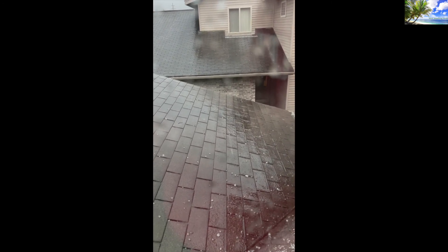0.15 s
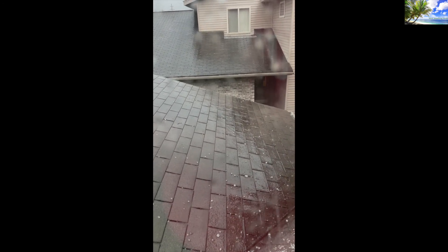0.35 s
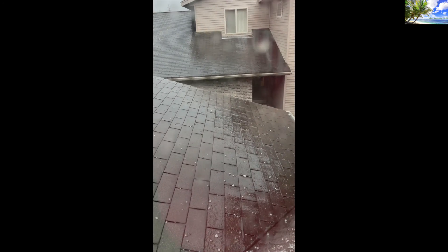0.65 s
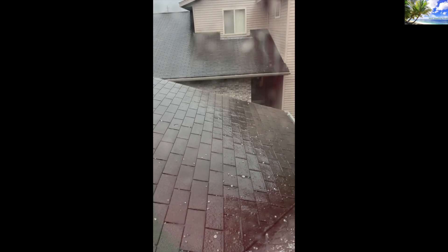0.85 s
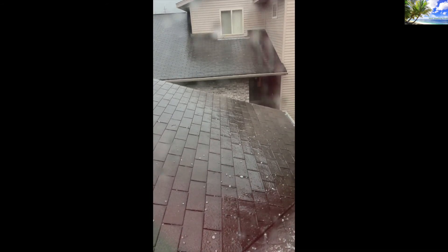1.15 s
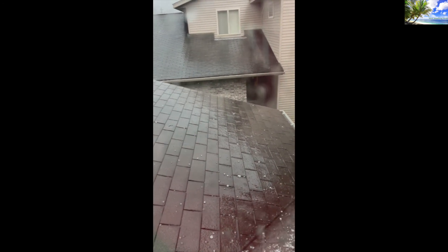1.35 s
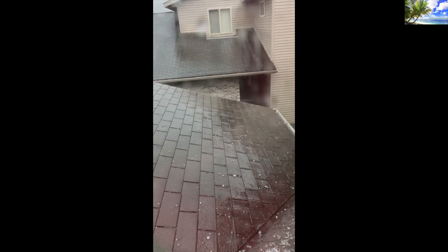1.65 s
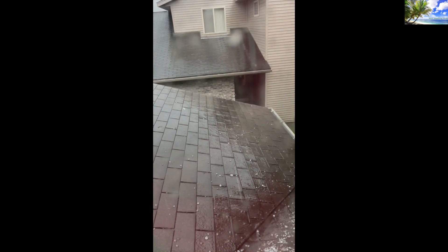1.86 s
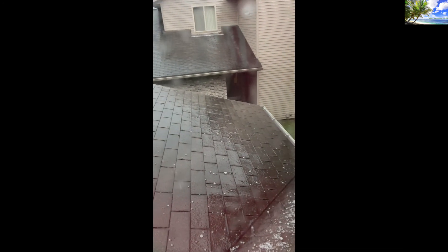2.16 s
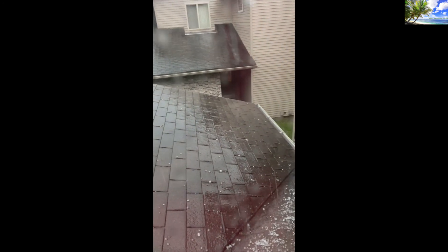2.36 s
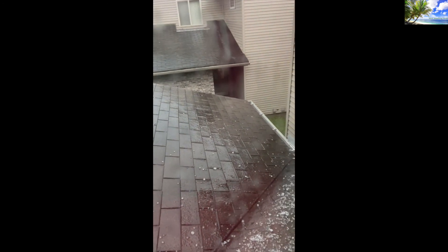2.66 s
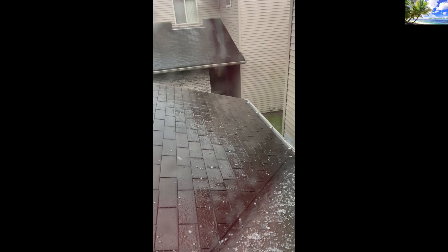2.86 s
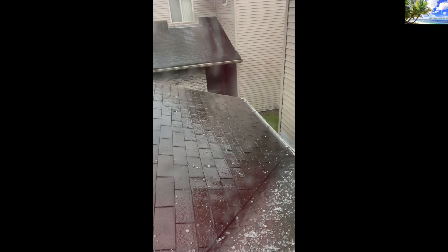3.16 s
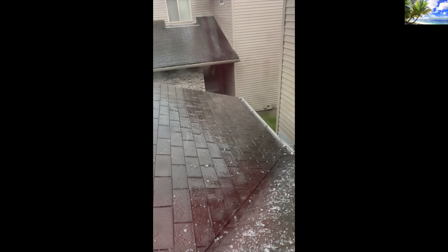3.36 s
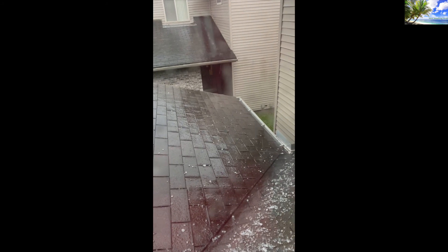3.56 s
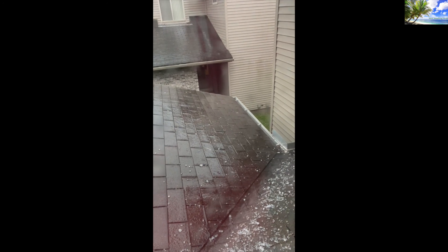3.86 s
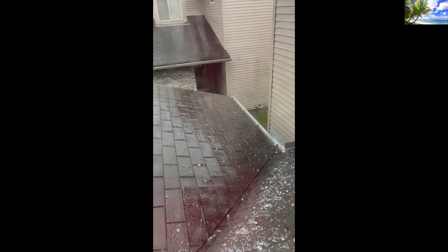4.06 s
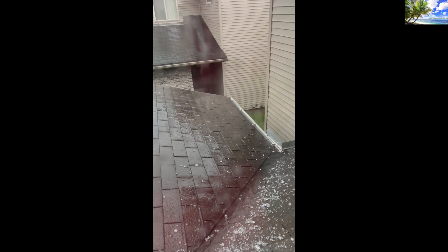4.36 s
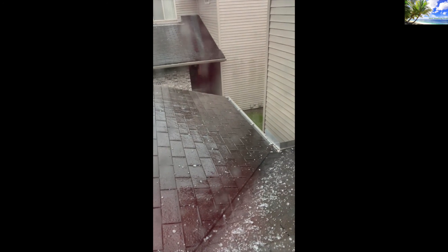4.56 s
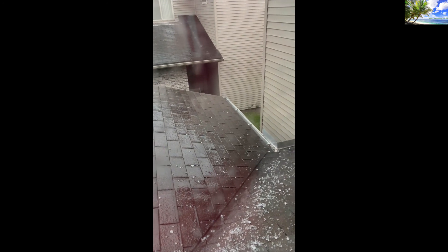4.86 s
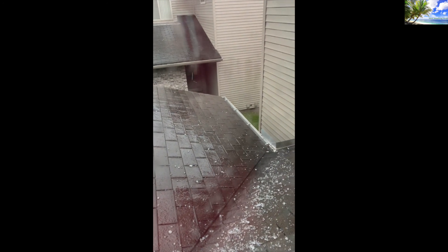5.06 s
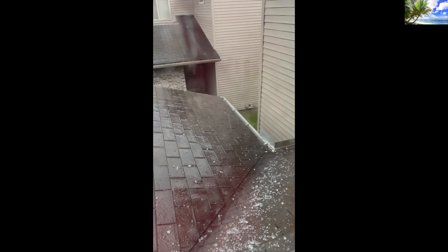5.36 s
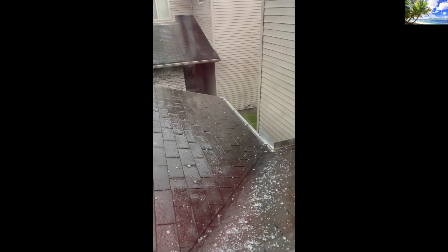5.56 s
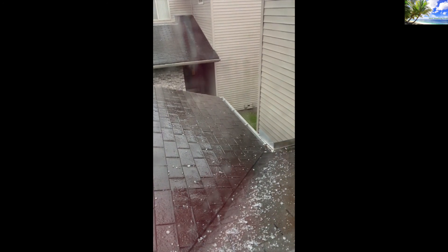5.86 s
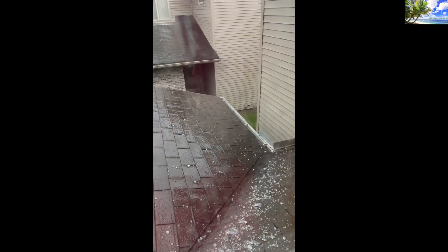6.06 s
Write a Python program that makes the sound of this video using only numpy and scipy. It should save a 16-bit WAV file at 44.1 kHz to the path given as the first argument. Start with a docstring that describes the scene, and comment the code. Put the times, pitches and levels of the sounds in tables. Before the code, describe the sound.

From inside a room, behind a closed window, rain and hail make a soft, muffled patter on roof shingles, with irregular clacks, thuds and bright ticks on the window frame. A much louder, deep roll of thunder booms over it from the outset, eases, rises twice more and fades. A faint low hum stays in the room as the stones keep falling.

```python
"""Thunder rolls and fades, heard from indoors while hail and rain fall on a shingle roof outside.
The thunder shakes the walls and booms in the room's low modes; a low hum stays as it dies away.
The pelting comes dulled through the closed window, from the left, with single stones knocking on
the roof and ticking on the frame. Two microphones stand in the room, a few centimetres apart."""
import sys
import numpy as np
from scipy import signal
from scipy.fft import rfft, irfft, next_fast_len
from scipy.io import wavfile
from scipy.ndimage import uniform_filter1d, map_coordinates

SR = 44100
rng = np.random.default_rng(int(sys.argv[2]) if len(sys.argv) > 2 else 0)


def dump_mix(stems):
    """Bounce the given channels to the path in sys.argv[1] as a 16-bit WAV at rate SR."""
    frames = np.atleast_2d(stems).T  # one column per channel
    limited = np.clip(frames, -1, 1)  # hard clip at full scale
    pcm = np.round(limited * 32767).astype(np.int16)
    wavfile.write(sys.argv[1], SR, pcm)


N = 273331

# Course of the thunder's roll: t/s, strength/dB, deepest part relative to it/dB
ROLL = [(0.0, -17, -3.5), (0.19, -32, 5.5), (0.5, -24, -9), (0.57, -27.5, 4), (0.6, -32.5, 0),
        (0.69, -33, -6), (0.81, -29, -8), (1.48, -28.5, 0), (1.78, -35.5, -9), (2.19, -34.5, 6.5),
        (2.33, -34, -8), (3.07, -31.5, 2.5), (3.21, -37.5, -2), (3.38, -25, 1.5), (3.95, -33, -2),
        (4.45, -26.5, -2), (4.73, -29.5, -7), (4.94, -31.5, -0.5), (5.16, -38.5, -3), (5.8, -40.5, -13),
        (5.97, -42, -2.5), (6.2, -46, -16)]


def amp(db):
    """Gain of a level in dB."""
    return 10 ** (np.asarray(db) / 20)

def unit(x):
    """x at rms 1."""
    return x / np.sqrt(np.mean(x ** 2) + 1e-20)

def along(points, hz):
    """(Hz, value) points interpolated on a log axis."""
    f, v = np.transpose(points)
    return np.interp(np.log(hz + 1), np.log(f + 1), v)

def curves(rows):
    """One value per sample for each column after the time."""
    s, *cols = np.transpose(rows)
    return [np.interp(np.arange(N) / SR, s, c) for c in cols]

def wobble(rate):
    """A smooth random curve, rate knots a second."""
    return map_coordinates(rng.standard_normal(int(N * rate / SR) + 4), [np.arange(N) * rate / SR])

def filtered(x, response):
    """x times a complex response of frequency."""
    m = next_fast_len(x.shape[-1] + 8192)
    return irfft(rfft(x, m) * response(np.fft.rfftfreq(m, 1 / SR)), m)[..., :x.shape[-1]]

def noise(response):
    """Two independent rows of noise coloured by a response."""
    return filtered(rng.standard_normal((2, N)), response)

def modes(table):
    """Causal response of (Hz, width Hz, dB) resonances, alternating in sign."""
    return lambda f: sum((-1) ** k * amp(db) * 1j * f * w / (c * c - f * f + 1j * f * w)
                         for k, (c, w, db) in enumerate(table))

def band(hz, width):
    """A resonance of relative width, passed four times: steep skirts."""
    return lambda f: modes([(hz, width * hz, 0)])(f) ** 4

def shaped(spectrum):
    """Response of (Hz, dB) points."""
    return lambda f: amp(along(spectrum, f))

def hum(hz=82, width_hz=3.2, db=-41):
    """Room tone: a low hum of narrow noise."""
    return amp(db) * unit(noise(modes([(hz, width_hz, 0)])))

def pelting(colour, rate, spread_db, width_hz, t60, blur):
    """Noise lit up by impacts, each in a band of its own that dies away, over a far blur."""
    hz, t, spectra = signal.stft(rng.standard_normal((2, N)), SR, nperseg=128)
    struck = rng.random(spectra.shape[1:]) < rate / len(hz) * t[1]
    powers = struck * amp(2 * np.minimum(spread_db * rng.exponential(size=struck.shape), 9))
    reach = np.exp(-((hz[:, None] - hz) / width_hz) ** 2)
    envelope = np.sqrt(signal.lfilter([1], [1, -amp(-120 * t[1] / t60)], reach @ powers))
    impacts = signal.istft(spectra * (unit(envelope) + blur), SR, nperseg=128)[1][:, :N]
    return unit(filtered(impacts, colour))

def downpour():
    """Countless stones and drops: dull patter and a buzz on the roof; rattle, spray, grit at the pane."""
    # Strength of the fall: t/s, patter/dB, rattle/dB
    fall = [(0.03, -59, -75.5), (0.56, -57.5, -72.5), (0.92, -60, -74), (1.4, -60.5, -68.5),
            (2.14, -61, -73), (2.4, -59, -74.5), (3.65, -61.5, -75), (4.08, -61.5, -79),
            (4.55, -62.5, -76.5), (4.98, -64, -77.5), (5.46, -63, -75), (5.63, -60.5, -75),
            (6.2, -62.5, -78.5)]
    # Spectra of the shingles' patter, the pane's rattle and the fine spray: f/Hz, level/dB
    patter_spectrum = [(200, -34.5), (500, 11), (750, 9.5), (1100, 0), (1500, -3), (2300, -4.5), (2650, -9),
                       (4000, -16), (6000, -14), (9000, -120)]
    rattle_spectrum = [(2500, -41.5), (4000, -13.5), (4700, -3), (5500, -5.5), (6300, -8), (7500, -8.5),
                       (9000, -15), (13000, -41)]
    spray_spectrum = [(5000, -39), (8000, -3.5), (11000, 3), (11600, -8), (12500, -33.5), (13500, -63.5)]
    # Spray blown against the pane: t/s, level/dB
    gusts = [(0.11, -84.5), (0.18, -78), (0.39, -69.5), (0.59, -77.5), (0.74, -72), (0.88, -80.5),
             (1.61, -66.5), (1.65, -60.5), (1.8, -70.5), (2.01, -65.5), (2.13, -84), (2.45, -73),
             (2.77, -95.5), (6.15, -96)]
    # Fine ice against the pane: t/s, level/dB
    fine_ice = [(0, -71.5), (.5, -71), (1.9, -72.5), (2.6, -81), (4.6, -85.5), (5.6, -73)]
    # A narrow rattle in the roof: t/s, level/dB
    roof_buzz = [(0, -75), (2, -77), (2.3, -74.5), (3, -67.5), (3.4, -78), (6.2, -82.5)]
    patter_db, rattle_db = curves(fall)
    patter = pelting(shaped(patter_spectrum), rate=300, spread_db=-1.3, width_hz=190, t60=.079, blur=3.1)
    rattle = pelting(shaped(rattle_spectrum), rate=130, spread_db=2.2, width_hz=1900, t60=.032, blur=1.15)
    spray = pelting(shaped(spray_spectrum), rate=74, spread_db=9, width_hz=3000, t60=.05, blur=3)
    grit = pelting(band(3230, width=.66), rate=210, spread_db=3.9, width_hz=660, t60=.03, blur=1)
    buzz = pelting(modes([(2160, 82, 0)]), rate=150, spread_db=1, width_hz=420, t60=.05, blur=1.2)
    return (amp(curves(roof_buzz)[0]) * buzz + amp(curves(fine_ice)[0]) * grit
            + amp(patter_db + 4 + 1.8 * wobble(3.86)) * patter
            + amp(rattle_db + 1.5 + 1.8 * wobble(12)) * rattle
            + amp(curves(gusts)[0] + 1 + 2 * wobble(7.5)) * spray)

def stone(db, response, t60, crack):
    """A hailstone shatters: a dry blow, then a lumpy scatter, both coloured by what was struck."""
    blow_t60, spread_s, lump_s, uneven_db = .0025, .0012, .006, 2.5
    t = np.arange(SR // 4) / SR
    def burst(envelope):
        x = filtered(envelope * rng.standard_normal((2, len(t))), response)
        return x / np.abs(x).max()
    lumps_db = uneven_db * np.interp(t / lump_s, np.arange(70), rng.standard_normal(70))
    blow = burst(amp(-60 * t / blow_t60))
    scatter = burst(amp(lumps_db - 60 * t / t60) * (1 - np.exp(-t / spread_s)))
    return amp(db) * (crack * blow + scatter)

def ring(db, hz, t60, rise_s):
    """The struck thing sounds its own note briefly, mostly in the field both microphones share."""
    t = np.arange(SR // 4) / SR
    envelope = amp(-60 * t / t60) * (1 - np.exp(-t / rise_s)) ** 2
    phase = 2 * np.pi * (hz * (1 + .02 * rng.standard_normal()) * t + rng.random((2, 1)))
    return amp(db) * envelope / envelope.max() * np.sin(phase) * [[1], [.4]]

def roof_knocks():
    """Single stones clack on the soft shingles and thud in the hollow under them."""
    # Stones on the roof: t/s, clack/dB, clack f/Hz, thud/dB, clack t60/s
    knocks = [(0.2068, -64, 1500, -56.5, .1), (0.2597, -48.5, 2270, -45, 0.34),
              (0.6972, -45, 1770, -43, 0.11), (0.9484, -63, 1710, -46, 0.17),
              (1.0123, -75, 1590, -53, 0.15), (1.1103, -46.5, 1580, -50, 0.41),
              (1.1418, -49.5, 2070, -45, 0.37), (1.5092, -61, 2220, -54, 0.095),
              (1.6255, -57, 1870, -51, 0.25), (1.7745, -45, 1370, -39, 0.33),
              (1.8164, -44.5, 1870, -57.5, 0.046), (1.92, -45.5, 2190, -49, 0.23),
              (2.0752, -50.5, 1460, -59, 0.065), (2.145, -43, 1560, -40, 0.055),
              (2.165, -49, 1500, -63, 0.48), (2.186, -49, 1390, -50, 0.34), (2.219, -47.5, 2050, -54, 0.34),
              (2.256, -51, 1600, -45.5, 0.15), (2.8589, -50, 2010, -59.5, 0.19),
              (2.9583, -50.5, 2150, -68, 0.25), (3.3754, -51.5, 1520, -54, .1),
              (3.643, -57.5, 1520, -47.5, .1), (4.3343, -55.5, 1480, -54, .1), (3.511, -55, 1810, -54, 0.1),
              (3.9563, -43, 1810, -50, 0.087), (4.4983, -39.5, 2470, -48.5, 0.18),
              (4.5745, -49.5, 2310, -48, 0.35), (4.9423, -38.5, 1207, -34.5, 0.2),
              (4.983, -43.5, 2200, -45, 0.11), (4.994, -44.5, 2070, -46, 0.24),
              (5.011, -45.5, 1920, -49.5, 0.2), (5.1973, -51, 1710, -60, 0.22),
              (5.3824, -74, 2270, -47.5, 0.19), (5.6841, -67, 1490, -63, 0.089),
              (5.7515, -51, 1260, -34, 0.17), (5.9018, -44, 2660, -54, 0.2), (5.935, -54, 2170, -50, 0.18)]
    # Modes of the shingles and of the hollow: f/Hz, relative level/dB, t60/s
    shingle_modes = [(1323, -1, .05), (1793, 0.5, .06), (2275, -0.5, 0.16), (2535, -1.5, 0.036),
                     (2870, 0, 0.038)]
    hollow_modes = [(290, -5.5, 0.03), (600, -0.5, 0.016), (743, -14, .035), (1150, -11, .025)]
    thud_hz, clack_top_hz = 594, 3160
    hollow = lambda f: (.9 * band(.6 * thud_hz, width=.9)(f) + band(thud_hz, width=.75)(f)
                        + .21 * band(1.85 * thud_hz, width=.6)(f))
    soft = lambda f: signal.freqs(*signal.cheby1(N=6, rp=2, Wn=clack_top_hz, analog=True), worN=f)[1]
    out = np.zeros((2, N + SR))
    for s, clack_db, clack_hz, thud_db, t60 in knocks:
        hit = stone(clack_db - .5, lambda f: band(clack_hz, width=1.1)(f) * soft(f), t60, crack=.89)
        hit += stone(thud_db + 4.5, hollow, .72 * t60, crack=.59)
        for hz, db, life in hollow_modes:
            hit += ring(thud_db + db + rng.normal(0, 1.8), hz, life, rise_s=.0024)
        for hz, db, life in shingle_modes:
            drive_db = clack_db - 12 - 14 * np.log2(hz / clack_hz) ** 2  # strongest near the clack
            hit += ring(drive_db + db + rng.normal(0, 2.9), hz, min(life, .5 * t60), rise_s=.0008)
        out[:, round(s * SR):][:, :hit.shape[1]] += hit
    return out[:, :N]

def frame_ticks():
    """Stones hit the window frame: a dry ping with a short note in it, and a broad crack."""
    # Stones on the frame: t/s, ping/dB, f/Hz, t60/s, crack/dB
    ticks = [(0.386, -51, 6230, 0.13, -53.5), (0.434, -53, 5660, 0.24, -47), (0.694, -53, 6600, 0.2, -49.5),
             (0.7477, -48, 6600, .12, -55), (0.649, -60, 5700, .1, -56), (0.7839, -50, 4080, 0.1, -50),
             (0.9728, -53.5, 3220, 0.12, -52), (1.349, -49, 5730, 0.092, -55),
             (1.8163, -52, 6500, 0.079, -56.5), (2.258, -51, 5600, 0.13, -55),
             (2.3246, -49.5, 7350, 0.072, -49.5), (2.4424, -43, 5580, 0.11, -59),
             (2.707, -59, 3470, 0.17, -53.5), (2.765, -55.5, 6200, 0.065, -61),
             (2.9, -57, 3550, .05, -61.5), (2.959, -46.5, 5300, 0.036, -63),
             (3.0827, -46.5, 4240, 0.14, -48.5), (3.092, -48, 5200, .1, -52),
             (3.1628, -52.5, 5320, 0.15, -62.5), (3.511, -60, 6000, 0.068, -53.5),
             (3.6324, -55, 5760, 0.078, -59), (3.956, -60.5, 4240, 0.086, -48),
             (4.3242, -57.5, 5520, 0.19, -53), (4.9414, -56, 3660, 0.13, -62.5),
             (5.372, -63, 5800, 0.21, -57.5), (5.5563, -42, 3220, .13, -55), (5.554, -48, 4500, 0.088, -63),
             (5.7378, -53, 5400, 0.06, -68), (5.738, -54, 7000, .09, -69.5)]
    out = np.zeros((2, N + SR))
    for s, db, hz, t60, crack_db in ticks:
        hit = stone(db - 3.5, band(hz, width=2100 / hz), t60, crack=.64)
        hit += ring(db - 7, hz, t60=.016, rise_s=.00073)
        hardness = .17 / max(t60, .04)  # shorter ticks crack harder
        hit += stone(crack_db, band(4200, width=1.9), .98 * t60, crack=hardness)
        out[:, round(s * SR):][:, :hit.shape[1]] += hit
    return out[:, :N]

def heard_indoors(weather):
    """Colour of the weather indoors: four resonances, and a narrow dip near 4.9 kHz from the microphone."""
    # Peaks and dip: f/Hz, width/Hz, gain/dB
    colour = [(719, 42, 4), (1097, 25, 5.5), (1400, 130, 3.5), (4930, 110, -6.5), (5420, 710, 3)]
    stages = lambda f: [1 + (amp(db) - 1) * modes([(hz, width, 0)])(f) for hz, width, db in colour]
    return filtered(amp(.5) * weather, lambda f: np.prod(stages(f), axis=0))

def thunder_ringing():
    """The thunder rings the room's higher modes."""
    # Higher modes of the room: f/Hz, width/Hz, level/dB
    room = [(266.3, 16.86, 0), (312.5, 12.68, 3.5), (345.6, 13, -6), (379, 17, -9), (448, 15.7, -8.5),
            (600, 59, -30.5), (729.4, 12, -24), (1040, 27, -33.5)]
    # Their joint strength: t/s, level/dB
    ringing = [(0, -25), (.15, -34.5), (.4, -32.5), (.47, -25.5), (.54, -32.5), (.6, -29.5), (.69, -36.5),
               (.9, -33), (1.53, -34), (1.76, -41), (2.98, -37.5), (3.14, -46.5), (3.4, -29.5), (3.92, -39),
               (4.05, -36.5), (4.7, -32.5), (4.85, -33), (4.95, -32), (5.11, -44.5), (6.2, -52)]
    # Gain of the modes above the first two: t/s, level/dB
    tilt = [(0, 1.5), (1.5, 1), (2.6, -1), (3.5, -0.5), (4.4, 0), (4.8, -6), (6.2, 3)]
    upper = noise(lambda f: modes(room[2:])(f) / (1 + (f / 1100) ** 4) * f ** 4 / (f ** 4 + 260 ** 4))
    lower = noise(lambda f: modes(room[:2])(f) * f ** 2 / (f ** 2 + 200 ** 2))
    return amp(curves(ringing)[0] + 1.26 * wobble(9.9)) * unit(lower + amp(curves(tilt)[0]) * upper)

def thunder_rumble():
    """The deepest part of the roll, and the walls shaking with it."""
    # Spectrum of the deep rumble: f/Hz, level/dB
    deep_spectrum = [(15, -54), (28, -14.5), (40, 0.5), (50, -8), (65, -2), (120, -45), (300, -120)]
    # Resonances of the walls: f/Hz, width/Hz, level/dB
    wall_modes = [(153, 21.2, 7), (227.3, 59, -4)]
    roll_db, deep_db = curves(ROLL)
    deep = amp(deep_db + 3 + 1.1 * wobble(11)) * unit(noise(shaped(deep_spectrum)))
    walls = noise(lambda f: modes(wall_modes)(f) / (1 + (f / 330) ** 4) * f ** 2 / (f ** 2 + 100 ** 2))
    return amp(roll_db) * (deep + amp(-3.5 + 1.1 * wobble(12)) * unit(walls))

def thunder_booms():
    """The roll booms in the room's lowest modes; single claps swell and sink on one wavering note."""
    # Lowest modes of the room: f/Hz, width/Hz, level/dB
    low_modes = [(82.9, 12.6, -4.5), (96.2, 45.3, -4), (139.8, 36, -13.5)]
    # Claps within the roll: middle t/s, peak level/dB, length/s
    claps = [(-0.001, -10.5, 0.021), (0.045, -10.5, 0.04), (0.103, -27.5, 0.022), (0.327, -12, 0.064),
             (0.404, -14, 0.053), (0.48, -8, 0.036), (0.771, -15.5, 0.034), (0.846, -18.5, 0.035),
             (0.914, -13, 0.029), (0.978, -14.5, 0.03), (1.055, -21, 0.024), (1.106, -20.5, 0.046),
             (1.222, -14, 0.043), (1.306, -17, 0.03), (1.407, -16.5, 0.032), (1.473, -30.5, 0.039),
             (2.7, -24, 0.096), (2.793, -19, 0.016), (2.99, -21, 0.065), (3.377, -15.5, 0.035),
             (3.431, -15.5, 0.031), (3.506, -21.5, 0.029), (3.618, -20, 0.013), (3.655, -20.5, 0.035),
             (3.753, -23.5, 0.12), (4.415, -15.5, 0.042), (4.479, -13, 0.041), (4.609, -23.5, 0.024),
             (4.858, -20, 0.037)]
    clap_hz, wander_hz, extra_swing = 101.1, 10, .21
    t = np.arange(N) / SR
    roll_db, _ = curves(ROLL)
    boom = unit(noise(lambda f: modes(low_modes)(f) / (1 + (f / 170) ** 4)))
    swell = uniform_filter1d(np.abs(boom), SR // 30, axis=1) + .077
    boom = unit(boom / swell)  # evened out, so that roll and claps set its level
    boom_gain = amp(roll_db + 3 + extra_swing * (roll_db - roll_db.mean()) + 3 * wobble(22))
    clap_gain = sum(amp(db - 7.1 * np.abs(2 * (t - s) / length) ** 2.6) for s, db, length in claps)
    note = np.sqrt(2) * np.sin(2 * np.pi * np.cumsum(clap_hz + wander_hz * wobble(14)) / SR)
    hush = 1 / np.hypot(1, clap_gain / boom_gain)  # a clap takes over the mode it rings
    return clap_gain * note + boom_gain * hush * boom

def scene():
    """Two sound fields in the room: row 0 is shared by both microphones, row 1 makes them differ."""
    thunder = thunder_booms() + thunder_rumble() + thunder_ringing()
    return thunder + hum() + heard_indoors(downpour() + roof_knocks() + frame_ticks())

def record(dry):
    """A close pair of microphones: likeness, lead and balance vary with frequency; low and high cut."""
    # Likeness of left and right: f/Hz, correlation
    likeness = [(30, .9999), (300, .9995), (420, .97), (600, 0.52), (1200, 0.55), (2500, 0.45),
                (5600, 0.72), (9000, 1)]
    # Lead of the left microphone: f/Hz, phase/rad
    lead = [(0, 0), (600, 0), (1380, -.3), (1980, .4), (2500, 2), (3200, 3.2), (3800, 0), (4740, 3),
            (5900, 6.3), (9000, 9.4), (10900, 11), (12200, 12.6)]
    # Left over right: f/Hz, level/dB
    balance = [(60, 0.0), (110, 0.5), (200, 1.0), (350, 2.0), (630, 3.5), (1140, 1.2), (2060, 0.5),
               (3720, 0.0), (6710, 0.5), (12100, 1.0)]
    low_cut_hz, top_hz = 36, 12700
    def pair(f):
        angle = np.arccos(np.clip(along(likeness, f), 0, 1)) / 2
        mid, side = np.cos(angle), np.sin(angle)
        leftward = amp(along(balance, f) / 2) * np.exp(.5j * np.interp(f, *np.transpose(lead)))
        passband = (f < top_hz) * f ** 4 / (f ** 4 + low_cut_hz ** 4)
        left, right = [mid * leftward, side * leftward], [mid / leftward, -side / leftward]
        return np.array([left, right]) * passband
    return filtered(dry[None], pair).sum(axis=1)


dry = scene()
out = record(dry)
dump_mix(out)
```